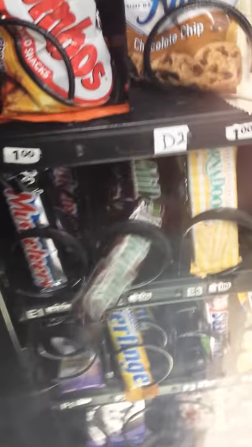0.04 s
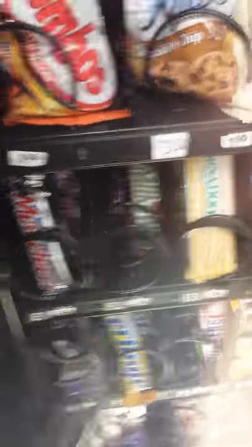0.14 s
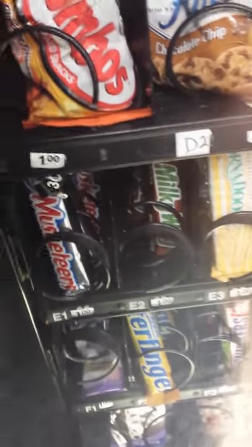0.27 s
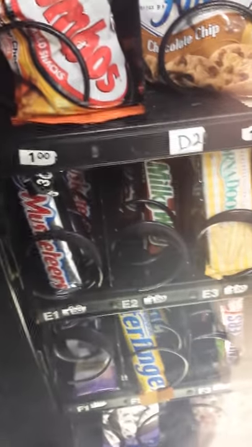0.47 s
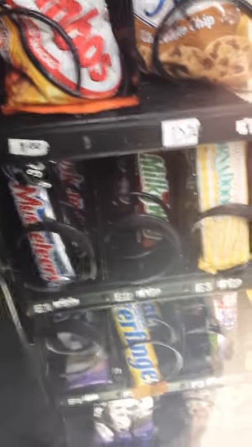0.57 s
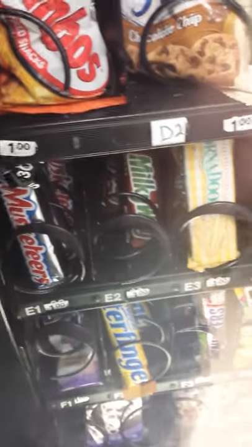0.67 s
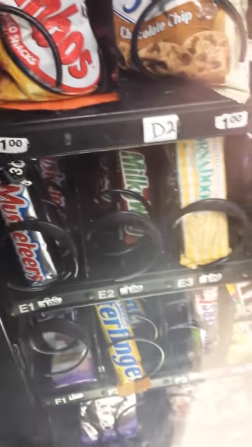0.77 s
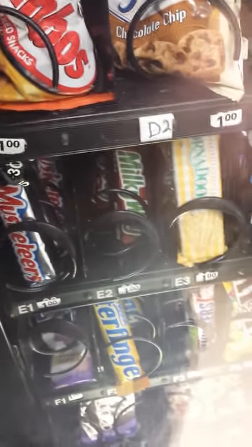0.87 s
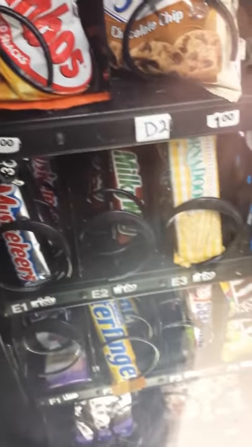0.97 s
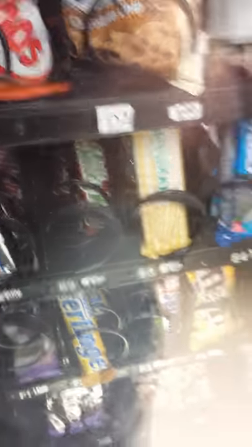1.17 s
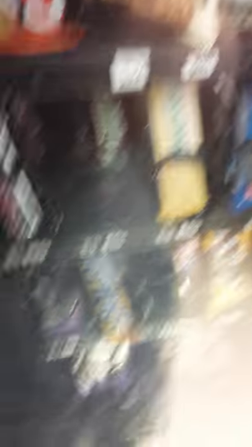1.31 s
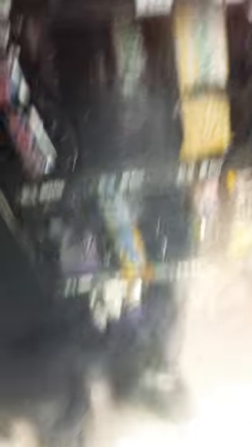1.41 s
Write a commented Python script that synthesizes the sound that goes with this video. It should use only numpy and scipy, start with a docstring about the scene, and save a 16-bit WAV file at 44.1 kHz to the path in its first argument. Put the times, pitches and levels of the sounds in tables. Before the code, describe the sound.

A candy bar scrapes down inside a humming vending machine, thuds into the metal tray and settles. Brief handling pops hit the left microphone, then a hard plastic click and faint rustles follow.

```python
"""Candy bar in a vending machine

A vending machine hums and its fan rushes. A wrapped candy bar scrapes down inside, crinkling and
ringing the wire coils, then thuds into the sheet-metal tray, skids and settles. Handling makes the
left microphone pop, and later something clicks against the machine's front.
An automatic volume control turns the hum down at the thud and lets it swell back."""
import sys
import numpy as np
from scipy import signal
from scipy.fft import rfft, irfft
from scipy.io import wavfile
from scipy.ndimage import uniform_filter1d, minimum_filter1d

SR = 44100
rng = np.random.default_rng(int(sys.argv[2]) if len(sys.argv) > 2 else 0)


def master_out(mix):
    """Clip the mix to full scale and print it as 16-bit PCM to the path in sys.argv[1]."""
    frames = np.transpose(np.atleast_2d(mix))
    ceiling = np.clip(frames, -1, 1)
    pcm = np.round(ceiling * 32767).astype(np.int16)
    wavfile.write(sys.argv[1], SR, pcm)


N = 63945
TIME = np.arange(N) / SR
FREQS = np.fft.rfftfreq(2 * N, 1 / SR)

# How alike noise is on the left and right: f/Hz, likeness (1 = the same, 0 = unrelated)
STEREO_LIKENESS = [(30, 1), (100, 0.76), (300, 0.94), (640, 0.71), (1400, 0), (3000, 0.046), (15000, 0.3)]
# Tones of the compressor and fan: f/Hz, level/dB
HUM_TONES = [(91.3, -36.5), (119.6, -35), (177.4, -37.5), (226.5, -38.5), (258, -45), (409.2, -40.5),
             (635, -54)]
# Tone colour of the fan's rushing air: f/Hz, level/dB
FAN_COLOUR = [(20, -15.5), (55, -9), (90, -5.5), (230, -3.5), (330, -5), (450, -10.5), (600, -9.5),
              (800, -16.5), (1200, -21), (2000, -28.5), (3000, -29.5), (4200, -30.5), (6500, -39.5),
              (9000, -47.5), (14000, -47)]
# Scrapes and small clicks (t60 is the time a sound takes to fade by 60 dB):
# peak t/s, wrapper level/dB, rise/s, t60/s, cabinet level/dB, wire level/dB
SCRAPE_EVENTS = [(0.042, -33.5, 0.021, 0.11, -42, -38.5), (0.073, -35.5, 0.0079, .12, -31.5, -69),
                 (0.157, -35.5, 0.014, 0.35, -54, -51), (0.204, -38, 0.011, 0.19, -29, -42),
                 (0.224, -40, 0.0059, .20, -33, -36), (0.249, -25, 0.0076, 0.14, -33.5, -45),
                 (0.3, -20, 0.0033, 0.36, -11, -50), (0.355, -33.5, 0.0014, 0.19, -19.5, -55),
                 (0.442, -34.5, 0.0091, 0.35, -36, -30), (0.501, -31.5, 0.0091, 0.13, -34, -50),
                 (0.858, -38, 0.0093, 0.13, -49, -46), (1.010, -43.5, 0.015, 0.35, -42, -45),
                 (1.160, -39, 0.0059, 0.097, -51, -42), (1.207, -49.5, 0.01, 0.04, -56, -53),
                 (1.323, -39.5, 0.0067, 0.34, -32, -77), (1.386, -37, .006, 0.18, -33.5, -45)]
# Tone colour of the crinkling wrapper: f/Hz, level/dB
WRAPPER_COLOUR = [(150, -13), (500, 4), (1000, 3.5), (1500, 3.5), (2200, 2.5), (3000, 2.5), (4200, -1.5),
                  (6500, -6.5), (9000, -9.5), (12000, -18), (15000, -3)]
# Tone colour of a bump on the cabinet: f/Hz, level/dB
BUMP_COLOUR = [(25, -33), (60, -19), (90, 2), (220, 8.5), (320, -2), (600, -4), (1200, -12.5), (4000, -92)]
# Ringing of the wire coils and shelf: f/Hz, width/Hz, level/dB
WIRE_RINGS = [(1244, 84, -3), (2288, 38, 2), (3010, 54, -7.5), (3385, 53, -4.5), (4630, 81, -28)]
# Blows of the bar on the tray: t/s, level/dB, contact time/s
TRAY_BLOWS = [(0.2988, 5, 0.00064), (0.3013, 16.5, 0.00041), (0.397, -10, 0.0017), (0.514, -10.5, 0.00056),
              (0.5330, -15, 0.00017), (1.112, -15, 0.0009)]
# The tray's own ringing tones: f/Hz, left level/dB, right level/dB, t60/s
TRAY_TONES = [(195.2, -27, -17.5, 0.21), (223, -20, -15.5, 0.19), (353, -21, -21, 0.31),
              (390.6, -11, -10.5, 0.26), (435.4, -20.5, -19, 0.34), (463, -16.5, -17, 0.26),
              (535.7, -14.5, -26, 0.22), (632, -18, -21, 0.29), (690, -2.5, -10.5, 0.1),
              (771, -16, -19.5, 0.24), (898, -17, -24, 0.19), (990, -20, -15.5, 0.12),
              (1150, -17, -19, 0.048), (1287, -26, -19, 0.1)]
# The tray's floor gives under a blow and stops at once: f/Hz, level/dB, t60/s
THUMP_TONES = [(245, -7, 0.024), (435, -1, 0.028), (676, -5, 0.059)]
# Tone colour of the panels' many close-packed tones: f/Hz, level/dB
PANEL_COLOUR = [(100, -20), (200, -13), (400, 8), (700, 5.5), (1000, 0), (1400, -8), (2200, -28),
                (4000, -44), (9000, -62)]
# Handling pops in the left microphone: t/s, level/dB
HANDLING_POPS = [(0.5585, -2.5), (0.5668, -8.5), (0.5695, -5.5), (0.6016, -9)]
# Tone colour of the hard plastic click: f/Hz, level/dB
CLICK_COLOUR = [(200, -16), (380, 8), (530, 11.5), (850, 0.5), (1400, -3.5), (1670, 1), (2000, -1),
                (2500, 3), (4000, 0.5), (6500, -6), (9000, -12), (12000, -20), (14000, -4.5)]
# Tone colour of the two microphones: f/Hz, left level/dB, right level/dB
MIC_COLOUR = [(1030, -0.5, -0.5), (2610, -1, -1), (4290, -11, -1.5), (4770, -4.5, 5), (5240, -11.5, 5),
              (6140, -7.5, 12), (6460, -15, 17), (7050, -10, 14), (7500, -7, 14), (8000, -11, 10),
              (9030, -13, 9.5), (12100, -16, 5), (14900, -38, -12.5)]


def amp(db):
    """Turns decibels into a number to multiply by."""
    return 10 ** (np.asarray(db) / 20)


def unit(x):
    """Scales a signal to an average power of 1."""
    return x / np.sqrt(np.mean(x ** 2) + 1e-20)


def curve(table, column=1):
    """Joins a table's points into a value for every frequency, on a log scale."""
    table = np.array(table)
    return np.interp(np.log(FREQS + 1), np.log(table[:, 0]), table[:, column])


def shape(x, gain):
    """Turns each frequency up or down by its own gain."""
    return irfft(rfft(x, 2 * N) * gain)[..., :N]


def noise(gain):
    """Stereo noise with a given tone colour, most alike on both sides in the bass."""
    shared, separate = rng.standard_normal((2, N))
    likeness = curve(STEREO_LIKENESS)
    left = shape(shared, gain)
    right = shape(shared, gain * likeness) + shape(separate, gain * np.sqrt(1 - likeness ** 2))
    return unit(np.array([left, right]))


def fade(t, t60):
    """Stays at 1 until t = 0, then falls 60 dB every t60 seconds."""
    return np.exp(-np.log(1000) * np.maximum(t, 0) / t60)


def convolve(x, response):
    """Lets every sample of x set off a copy of a stereo response."""
    return signal.fftconvolve(np.atleast_2d(x), response, axes=1)[:, :N]


def machine_hum(air_db=-31.5, waver_hz=4.1, waver_db=2, drift_rad=0.51):
    """The compressor and fan hum in wavering tones over the rush of air."""
    out = amp(air_db) * noise(amp(curve(FAN_COLOUR)))
    slow_only = np.exp(-(FREQS / waver_hz) ** 2)
    for hz, db in HUM_TONES:
        swell, drift = unit(shape(rng.standard_normal((2, N)), slow_only))
        phase = 2 * np.pi * (hz * TIME + rng.random()) + drift_rad * drift
        out += np.sqrt(2) * amp(db + waver_db * swell) * np.sin(phase)
    return out


def scrapes(crinkles_per_s=4000, spread_db=-4, crinkle_share=0.19):
    """Each touch crinkles the wrapper, bumps the cabinet and sets the wire coils ringing."""
    # The wrapper is tiny snaps of random strength mixed with a smooth hiss.
    snaps = rng.random(N) < crinkles_per_s / SR
    strength = amp(spread_db * np.minimum(rng.exponential(1, N), 4))
    colour = amp(curve(WRAPPER_COLOUR))
    crinkle = unit(shape(snaps * strength * rng.standard_normal((2, N)), colour))
    wrapper = np.sqrt(crinkle_share) * crinkle + np.sqrt(1 - crinkle_share) * noise(colour)
    bump = noise(amp(curve(BUMP_COLOUR)))
    wire_peaks = sum(amp(db) / (1 + (2 * (FREQS - hz) / width) ** 2) for hz, width, db in WIRE_RINGS)
    wire = noise(wire_peaks)
    out = np.zeros((2, N))
    for peak_s, wrapper_db, rise_s, t60, bump_db, wire_db in SCRAPE_EVENTS:
        age = TIME - peak_s
        rise = np.exp(-(np.minimum(age, 0) / rise_s) ** 2)
        mix = amp(wrapper_db) * wrapper + amp(bump_db) * bump + amp(wire_db) * wire
        out += rise * fade(age, t60) * mix
    return out


def room_echo(x, level_db=-5, t60=0.47):
    """The room's echoes blur into a fading tail, different at each microphone."""
    tail = rng.standard_normal((2, N)) * fade(TIME, t60)
    return amp(level_db) * convolve(x, tail / np.linalg.norm(tail[0]))


def tray_thuds(spread_rad=1.6, bass_cut_hz=184):
    """Soft blows ring the tray, clatter the panels and echo in the hollow cabinet."""
    force = np.zeros(N)
    for hit_s, db, contact_s in TRAY_BLOWS:
        push = np.exp(-(2 * (TIME - hit_s) / contact_s) ** 2)
        force += amp(db) * push / push.sum()
    # Bending waves travel at different speeds, so the tones do not swing in step.
    ring = np.zeros((2, N))
    for k, (hz, left_db, right_db, t60) in enumerate(TRAY_TONES):
        tone = np.sin(2 * np.pi * hz * TIME + spread_rad * k ** 2)
        ring += amp([[left_db], [right_db]]) * tone * fade(TIME, t60)
    thump = sum(amp(db) * np.sin(2 * np.pi * hz * TIME) * fade(TIME, t60) for hz, db, t60 in THUMP_TONES)
    panel_fade = amp(-9.5) * fade(TIME, t60=0.018)
    cabinet_fade = amp(-21.5) * fade(TIME, t60=0.41)
    clatter = noise(amp(curve(PANEL_COLOUR))) * (panel_fade + cabinet_fade)
    # Thin metal gives off little bass.
    bass_cut = signal.butter(2, bass_cut_hz, "high", fs=SR, output="sos")
    return signal.sosfilt(bass_cut, convolve(force, ring + thump + clatter))


def handling_pops(decay_s=0.0025, swing_hz=111.6):
    """Handling the left microphone makes sudden jumps in pressure that leak away at once."""
    left = np.zeros(N)
    for start_s, db in HANDLING_POPS:
        age = np.maximum(TIME - start_s, 0)
        jump = amp(db) * (TIME >= start_s)
        left += jump * np.exp(-age / decay_s) * np.cos(2 * np.pi * swing_hz * age)
    return np.array([left, np.zeros(N)])


def plastic_click(start_s=1.1128, level_db=-16, rise_s=0.00098, hold_s=0.0054, t60=0.047):
    """Hard plastic snaps at the machine's front and breaks into a short, dense rattle."""
    age = TIME - start_s
    loudness = amp(level_db) * np.clip(age / rise_s, 0, 1) * fade(age - hold_s, t60)
    return loudness * noise(amp(curve(CLICK_COLOUR)))


def scene():
    """All the sounds reach a dull left microphone and a bright right one."""
    contacts = scrapes() + plastic_click()
    sound = contacts + room_echo(contacts) + tray_thuds() + machine_hum()
    mic_gains = amp([curve(MIC_COLOUR, column=1), curve(MIC_COLOUR, column=2)])
    return shape(sound, mic_gains) + handling_pops()


def record(dry):
    """Turns loud moments down, recovers slowly, rounds off peaks and cuts the highest treble."""
    limit_db, recover_db_per_s = -3.5, 17
    average_s, look_ahead_s, ramp_s, hold_s = 0.0054, 0.019, 0.032, 0.77
    ceiling, treble_cut_hz = 0.96, 15100
    power = abs(uniform_filter1d((dry ** 2).mean(0), int(average_s * SR)))
    excess_db = np.maximum(10 * np.log10(power + 1e-12) - limit_db, 0)
    coming_db = np.interp(TIME + look_ahead_s, TIME, excess_db)
    # Hold the biggest recent cut in volume, then let it go at a steady rate.
    span = int(hold_s * SR) | 1
    held_db = -minimum_filter1d(-coming_db, span, mode="constant", origin=span // 2)
    recovery_db = recover_db_per_s * TIME
    cut_db = np.maximum.accumulate(held_db + recovery_db) - recovery_db
    turned_down = dry * amp(-uniform_filter1d(cut_db, int(ramp_s * SR)))
    rounded = turned_down / (1 + (turned_down / ceiling) ** 8) ** (1 / 8)
    treble_cut = signal.firwin(401, treble_cut_hz, window=("kaiser", 8), fs=SR)
    return signal.oaconvolve(rounded, treble_cut[None], "same")


dry = scene()
out = record(dry)
master_out(out)
```